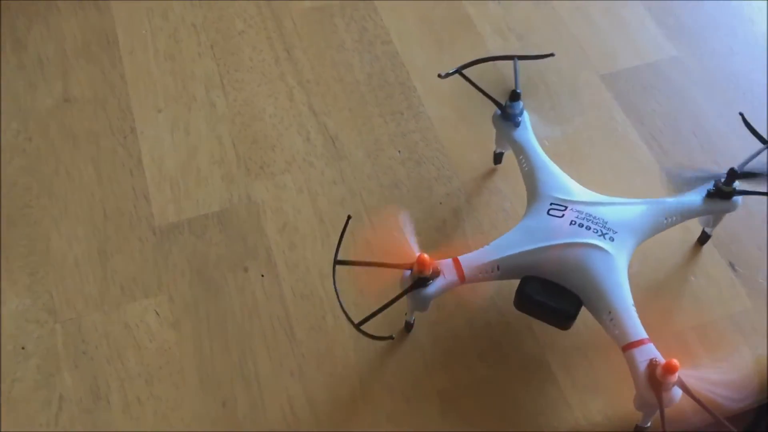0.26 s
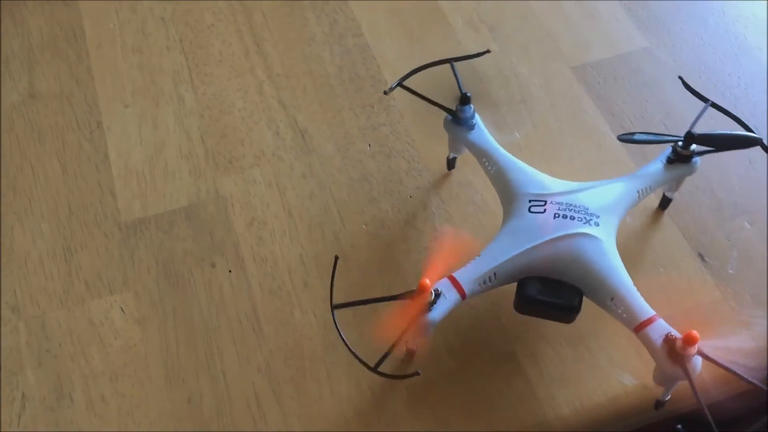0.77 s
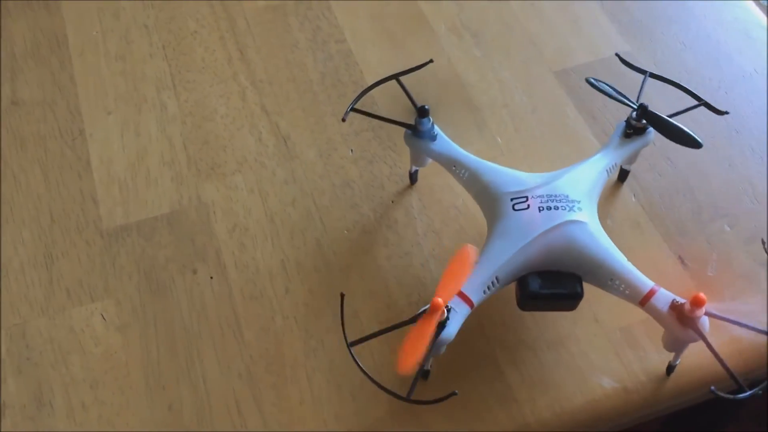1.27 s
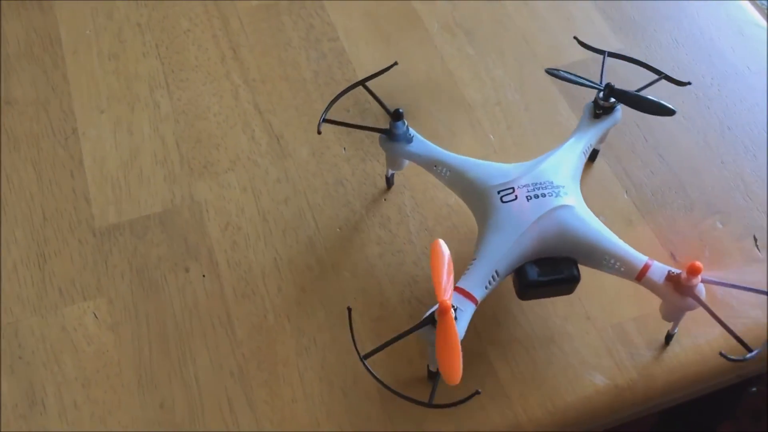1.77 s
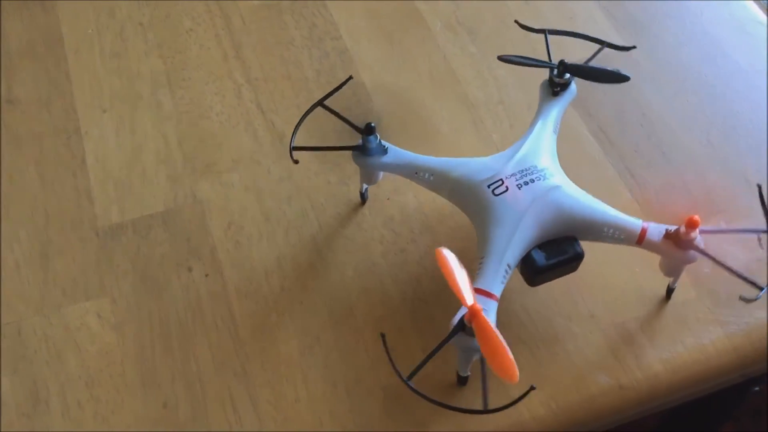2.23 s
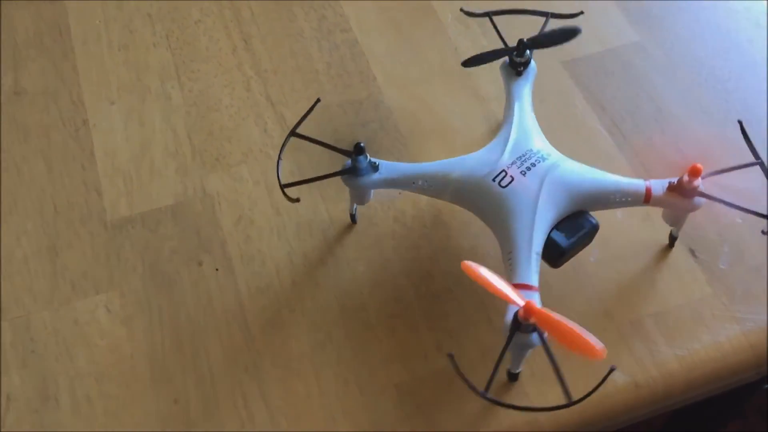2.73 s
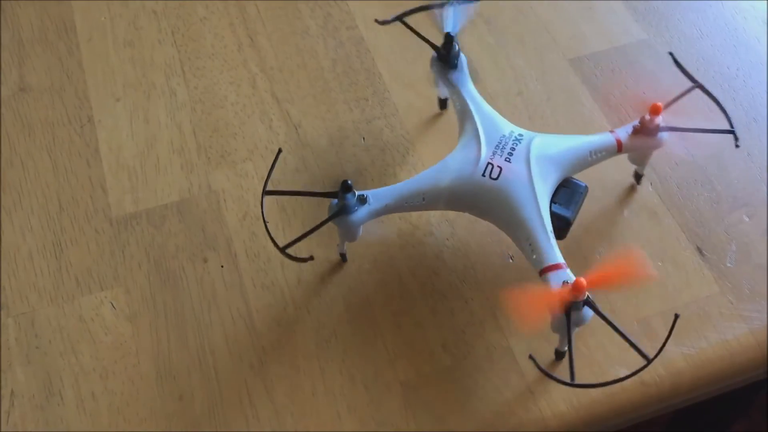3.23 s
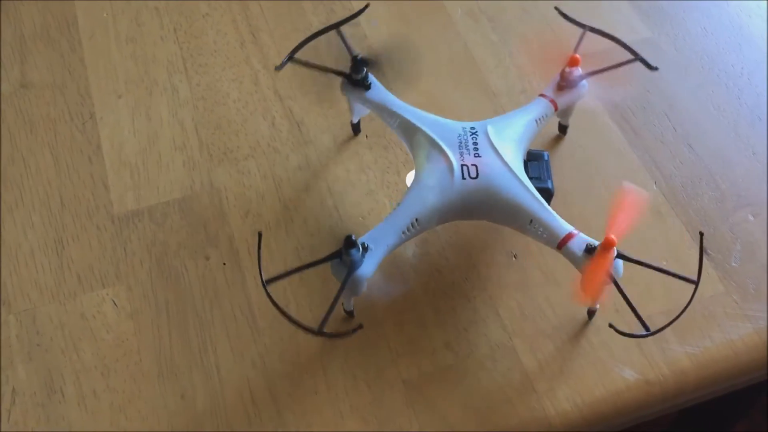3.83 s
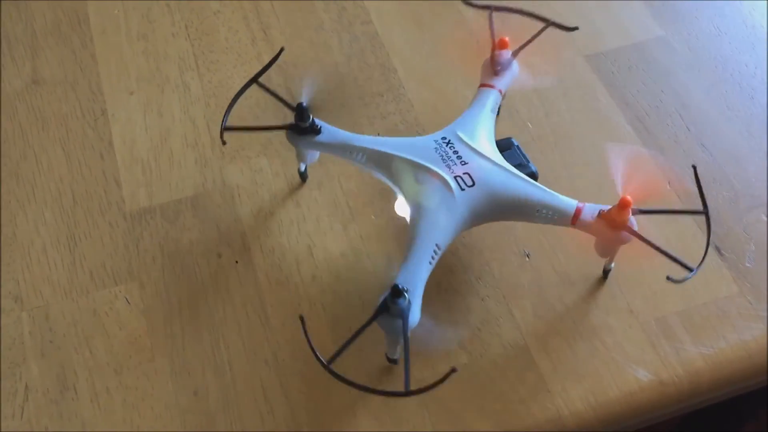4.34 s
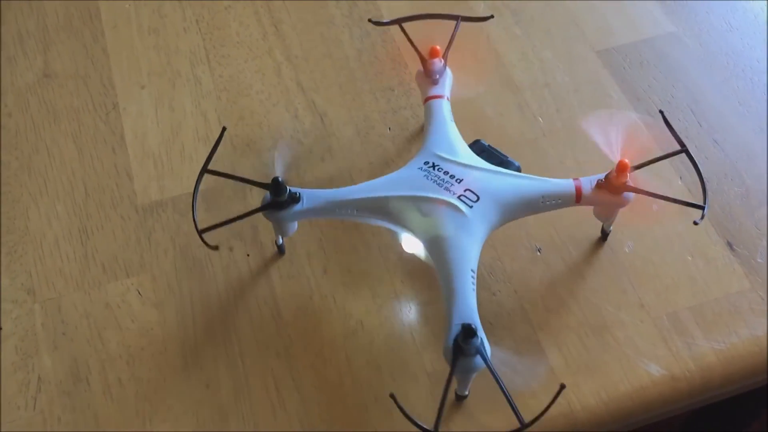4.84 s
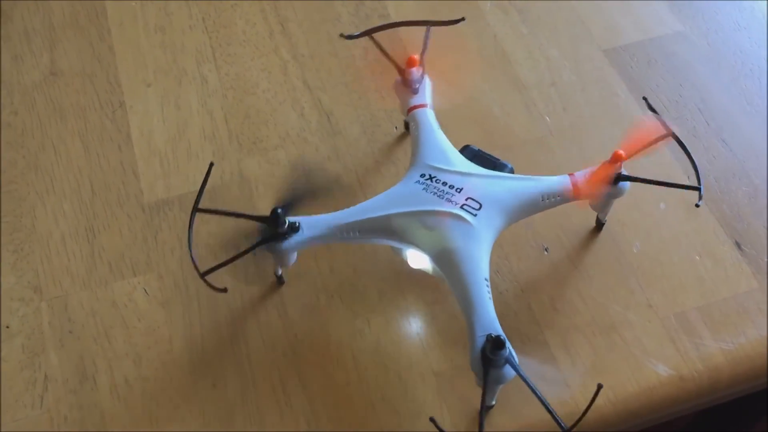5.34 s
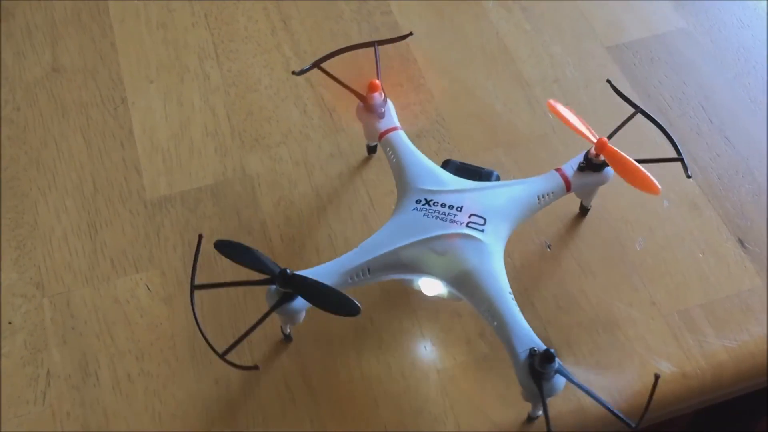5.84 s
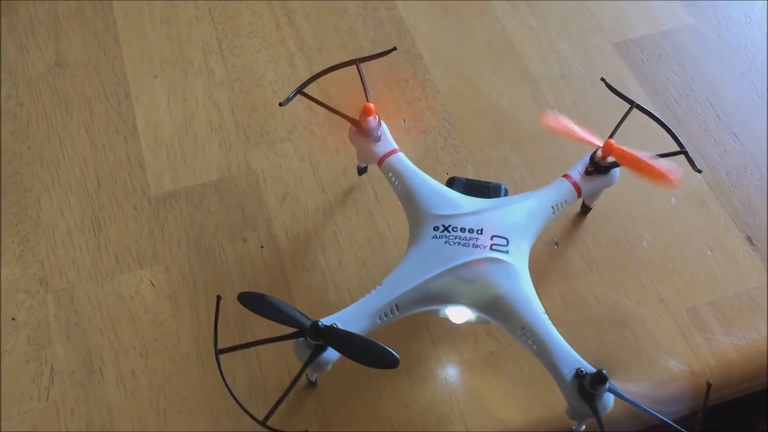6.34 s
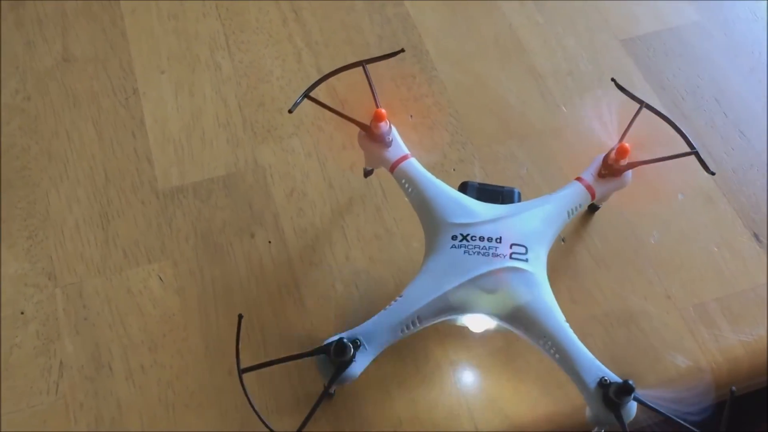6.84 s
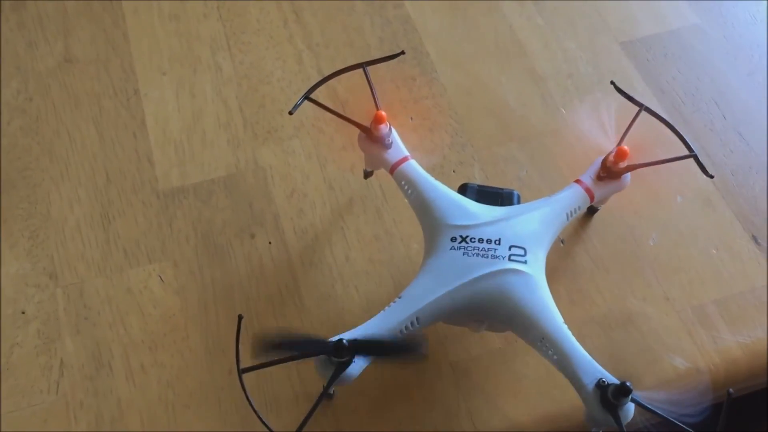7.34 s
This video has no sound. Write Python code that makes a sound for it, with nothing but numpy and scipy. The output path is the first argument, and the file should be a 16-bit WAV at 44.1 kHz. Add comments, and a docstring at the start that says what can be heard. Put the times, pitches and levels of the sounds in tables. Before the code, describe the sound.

A small toy quadcopter buzzes on a wooden table, close and dry, in a quiet room. From 0 s two slightly detuned motors spin up almost instantly to a shrill whine around 2 kHz, beating roughly, with a nasal gear buzz, raspy rattle and bright hiss above and soft propeller churning below. The pitch wavers quickly during the first 1.5 seconds. From about 2.3 to 3 s it sinks by roughly a tone; the hiss is duller and the tones shake about twenty-two times a second as the legs drum on the wood. Tiny dropouts nick the noise, strongest near 2.6 and 4.6 s. Around 5 to 5.4 s the whine climbs back, brighter and clearer. At 6.75 s power cuts: hiss and buzz fade fast, the pitches slide down and separate, and a thin gear whirr dwindles into faint room air and hum by about 7.6 s.

```python
"""Two slightly detuned motor whines beat over a gear rattle and bright hiss, then glide down into a quiet room.
They belong to a toy quadcopter skating on a wooden table; at lower throttle it rocks on its legs and the tones shake.
Sums of shaft orders make the whine, the gear buzz and the last whirr; noise let through in tooth bursts makes
the rasp and hiss. Coloured noise makes the propellers' churning, the legs' rumble and the room air."""
import sys
import numpy as np
from scipy import signal
from scipy.fft import rfft, irfft, next_fast_len
from scipy.io import wavfile

SR = 44100
rng = np.random.default_rng(int(sys.argv[2]) if len(sys.argv) > 2 else 0)


def to_wav(s):
    """Save 16-bit WAV."""
    ch = np.atleast_2d(s).T  # columns
    pcm = np.round(np.clip(ch, -1, 1) * 32767)  # PCM
    wavfile.write(sys.argv[1], SR, pcm.astype(np.int16))


N = 335050

CUT_S = 6.75  # the power is cut
GEAR_RATIO = 7.6  # shaft turns for each turn of the propeller
LOOSE_POWER = 4  # the frame only shakes the tones once it rocks hard


def amp(db):
    """Decibels to gain."""
    return 10 ** (np.asarray(db) / 20)


def unit(x):
    """Scale to rms 1."""
    return x / np.sqrt(np.mean(x ** 2) + 1e-20)


def along(points, hz):
    """Read (Hz, value) points on a log frequency axis."""
    f, v = np.transpose(points)
    return np.interp(np.log(hz + 1), np.log(f + 1), v)


def clock():
    """The time of every sample in seconds."""
    return np.arange(N) / SR


def curves(rows):
    """One value per sample for each column after the time."""
    s, *cols = np.transpose(rows)
    return [np.interp(clock(), s, c) for c in cols]


def wobble(rate):
    """A smooth random curve, rate knots a second."""
    oversample = 4
    knots = rng.standard_normal(int(N * rate / SR) + 4)
    fine = signal.resample_poly(knots, oversample, 1)
    return np.interp(clock() * rate, np.arange(len(fine)) / oversample, fine)


def random_phase():
    """A random starting angle in radians."""
    return rng.uniform(0, 2 * np.pi)


def filtered(x, response):
    """Multiply the spectrum of x by a response of frequency."""
    m = next_fast_len(N + SR // 2)
    return irfft(rfft(x, m) * response(np.fft.rfftfreq(m, 1 / SR)), m)[:N]


def noise(spectrum, bursts=1):
    """Noise of rms 1, let through in bursts and then coloured."""
    return unit(filtered(bursts * rng.standard_normal(N), lambda hz: amp(along(spectrum, hz))))


def shaft(track, coasting, rocking, sway, hunting, swing=0.31):
    """Speed, coasting share of it and angle of a motor; backlash, propeller load and rocking nudge the angle."""
    backlash, loose_backlash = .018, .06  # play of the shaft, and more at full rocking (radians)
    load = .03  # angle by which the propeller's load drags the shaft (radians)
    lag, fall = coasting  # lag and time constant (s)
    off = np.maximum(clock() - CUT_S, 0)
    coast = np.exp(-(off - lag * (1 - np.exp(-off / lag))) / fall)
    speed = (curves(track)[0] + hunting) * coast
    angle = 2 * np.pi * np.cumsum(speed) / SR

    loose = rocking ** LOOSE_POWER
    play = (backlash + loose_backlash * loose) * wobble(120)
    drag = load * np.sin(angle / GEAR_RATIO)
    rock = swing * loose * np.sin(sway + random_phase())
    return speed, coast, angle + play + drag + rock


def noise_dips():
    """Gain that briefly dips the level of the noise."""
    # brief dips in the noise: centre t/s, half length/s, depth/dB
    dip_rows = [(1.71, .009, 9), (2.16, .009, 10), (2.225, .007, 9), (2.352, .008, 9), (2.598, .013, 24),
                (3.115, .008, 9), (3.25, .008, 10), (4.055, .008, 9), (4.377, .009, 12), (4.59, .02, 28),
                (4.935, .007, 9), (5.105, .007, 8), (5.18, .007, 9), (5.615, .007, 9), (5.68, .007, 10),
                (6.815, .007, 8)]
    return amp(-sum(db * np.exp(-np.abs((clock() - s) / half) ** 4) for s, half, db in dip_rows))


def background(hum_hz=120, hum_db=-65, ring_hz=8500, ring_db=-67, air_db=-62):
    """Coloured noise for room air, a steady mains hum and a thin high ring of randomly varying strength."""
    # room air: f/Hz, relative level/dB
    room = [(20, 15), (60, 16), (250, 13), (600, 4), (1000, 6), (4000, 5), (11000, -10), (15000, -23)]
    hum = amp(hum_db) * unit(np.sin(2 * np.pi * hum_hz * clock()))
    ring = amp(ring_db) * unit(wobble(270) * np.sin(2 * np.pi * ring_hz * clock()))
    return hum + ring + amp(air_db) * noise(room)


def wash(motors, rocking, dips, legs_db=-55, churn_db=2.5, unbalance_db=-65, power=4):
    """Low propeller churning, the legs' rumble on the table and a faint unbalance tone once a turn of each shaft."""
    # propeller churning: f/Hz, relative level/dB
    churn_spectrum = [(20, -25), (40, -21), (65, -1.5), (130, -1), (200, 4), (300, -4.5), (400, -4),
                      (480, -24.5), (600, -24.5), (1000, -9), (3000, -28)]
    # swell of the churning: t/s, level/dB
    churn_level = [(0, -50), (1, -52.5), (2.3, -48), (3.2, -58), (4.3, -54.5), (5.3, -49), (6.75, -51.5)]
    # legs drumming on the table: f/Hz, relative level/dB
    legs_spectrum = [(20, -26), (60, -8), (130, 5), (165, -2), (230, -34), (400, -4), (560, -31),
                     (1500, -50)]
    unbalance = sum(np.sin(angle) for _, _, angle in motors)
    churn = amp(curves(churn_level)[0]) * noise(churn_spectrum)
    legs = amp(legs_db) * rocking * noise(legs_spectrum)
    rumble = amp(churn_db * wobble(28)) * dips * (churn + legs)
    coast = motors[0][1]
    return coast ** power * (rumble + amp(unbalance_db) * unbalance)


def whirr(motor, orders=(10, 14, 21)):
    """While the motor coasts, high shaft orders glide down through the shell's main resonance one after another."""
    level_db, resonance_hz, half_width_hz = -44, 2250, 180
    speed, coast, angle = motor
    tones = np.zeros(N)
    for order in orders:
        resonance = 1 / (1 + ((order * speed - resonance_hz) / half_width_hz) ** 2)
        tones += resonance * np.sin(order * angle + .7 * wobble(100))
    return amp(level_db + 2 * wobble(30)) * np.sqrt(coast) * tones


def flickering(x):
    """Each frequency band flickers in level on its own; the very top stays almost smooth."""
    # band edges: f/Hz
    edges = [0, 3000, 5000, 7000, 9000, 11500, 22000]
    # flicker depth of each band: level/dB
    depths = [1.3, 3, 2.6, 2.4, 2, .3]
    out = np.zeros(N)
    for lo, hi, db in zip(edges, edges[1:], depths):
        band = filtered(x, lambda hz: (hz >= lo) & (hz < hi))
        out += amp(db * wobble(100)) * band
    return unit(out)


def buzz(motor, rocking, spectrum, odd_db, mesh_db, free_mesh_db, soften_db, count):
    """High shaft orders slide through fixed resonances; odd ones and multiples of the seven pinion teeth are trimmed."""
    flutter_db, drift_db = 3, 1.7  # each order comes and goes, fast and slowly
    scatter, loose_scatter = .018, .15  # uneven tooth timing for each order, and more at full rocking (radians)
    hop = 256  # samples for each step of level
    speed, coast, angle = motor
    slowing = 1 - coast[::hop]
    out = np.zeros(N)
    for order in range(6, 6 + count):
        hz = order * speed[::hop]
        # slow teeth meet softly and ring only the shell's main resonance
        off_resonance = np.clip(np.abs(np.log(hz / 2200)) - .08, 0, .8)
        softening_db = soften_db * slowing ** 2 * off_resonance
        if order % 7 == 0:
            accent_db = mesh_db + free_mesh_db * slowing
        else:
            accent_db = odd_db * (order % 2)
        line_db = np.repeat(along(spectrum, hz) - softening_db + accent_db, hop)[:N]
        size = amp(line_db + flutter_db * wobble(48) + drift_db * wobble(11))
        # uneven timing widens the higher lines
        timing = (scatter + loose_scatter * rocking ** LOOSE_POWER) * order * wobble(130)
        out += size * np.sin(order * angle + timing + random_phase())
    return unit(out)


def gears(motors, rocking, lean_db, dips):
    """Teeth strike twice a turn with uneven force: a shell buzz, a rasp and a bright hiss; rocking weakens the buzz."""
    # shell buzz: f/Hz, relative level/dB
    shell_spectrum = [(300, -80), (700, -46), (1200, -32), (1750, -17), (2200, 10.5), (2500, 6), (2870, 2),
                      (3080, 1), (3350, -7), (3600, 8), (4000, -61), (4500, -53), (7000, -66)]
    # teeth of motor A: f/Hz, relative level/dB
    teeth_spectrum = [(2800, 3), (3350, 3.5), (3620, 8), (3950, -2.5), (4250, 3), (4650, -1.5), (5050, 0.5),
                      (5450, 9), (5850, 6), (6700, 6.5), (7500, 0.5), (8400, 0.5), (10000, 4), (11500, 1),
                      (15000, -3)]
    # teeth of motor B: f/Hz, relative level/dB
    far_teeth_spectrum = [(2800, 1), (3200, 1), (3600, 8), (4000, -4.5), (4400, 8), (4800, -9),
                          (5200, -1.5), (5600, -0.5), (6400, 2.5), (7300, 1), (8000, -15)]
    # rattle heard through the shell: f/Hz, relative level/dB
    rasp_spectrum = [(300, -80), (600, -24.5), (1020, -15), (1400, -7), (1800, -4), (2250, -0.5),
                     (2700, -7.5), (3080, -17), (3600, -40), (4500, -32), (7000, -47)]
    # bright gear hiss: f/Hz, relative level/dB
    hiss_spectrum = [(2000, -39), (3080, -7), (3450, -2.5), (3950, -8), (4700, -8.5), (5400, -5.5),
                     (6300, .5), (7200, -2.5), (8100, -3), (9500, .5), (10600, -.5), (12000, 2),
                     (14000, 1.8), (15300, 1.8)]
    # swell of the hiss and teeth: t/s, relative level/dB
    hiss_level = [(0, -29.5), (1.03, -30.5), (1.5, -32), (1.66, -35), (1.78, -33), (2.02, -32.5),
                  (2.14, -36), (3.3, -36), (4.65, -36.5), (4.88, -32), (5.07, -37.5), (5.13, -31.5),
                  (5.24, -34), (5.53, -32.3), (5.64, -35), (5.74, -31), (5.97, -33.5), (6.04, -30.5),
                  (6.22, -32), (6.55, -32), (6.76, -29.3)]
    # how clearly the teeth sing through the hiss: t/s, relative level/dB
    meshing = [(0, -0.5), (.15, -1), (1.3, 0), (2.02, 1), (2.12, -1), (2.36, 0), (2.5, -4.5), (5.05, -4),
               (5.35, -1), (6.75, -0.5)]
    buzz_db, rasp_over_buzz_db, freewheel_db = -34, -8, -18
    hiss_db, teeth_over_hiss_db = 3.5, 1.3
    far_shell_db, far_teeth_db, rocked_buzz_db = -2, -3, -6
    buzz_power, rasp_power, hiss_power = 4, 1.6, 3.55  # each layer falls with this power of coasting speed
    spin_up_s = 0.08  # the shell's buzz builds up as the motors gather speed
    eccentric_db = .8  # the big gear runs slightly out of true, once a propeller turn

    a, b = motors
    _, coast, angle = a
    _, coast_b, angle_b = b
    steady = amp(rocked_buzz_db * rocking)
    press_a = amp(eccentric_db * np.sin(angle / GEAR_RATIO))
    press_b = amp(eccentric_db * np.sin(angle_b / GEAR_RATIO))
    near_a = amp(0.8 * lean_db * coast)
    near_b = amp(-lean_db * coast / 2) * (coast_b / coast) ** 3  # motor B coasts down faster and fades first
    bursts = np.exp(0.42 * np.cos(2 * angle)) * amp(wobble(2500))

    shell_a = buzz(a, rocking, shell_spectrum, odd_db=-5, mesh_db=1, free_mesh_db=-3, soften_db=300, count=18)
    shell_b = buzz(b, rocking, shell_spectrum, odd_db=0, mesh_db=-2, free_mesh_db=-6, soften_db=300, count=12)
    teeth_a = buzz(a, rocking, teeth_spectrum, odd_db=-14, mesh_db=0, free_mesh_db=2, soften_db=75, count=25)
    teeth_b = buzz(b, rocking, far_teeth_spectrum, odd_db=-8.5, mesh_db=2.5, free_mesh_db=-15,
                   soften_db=62, count=14)
    spin_up = 1 - np.exp(-clock() / spin_up_s)
    shell_pair = near_a * press_a * shell_a + amp(far_shell_db) * near_b * press_b * shell_b
    teeth_pair = press_a * teeth_a + amp(far_teeth_db) * near_b * press_b * teeth_b
    shell_buzz = amp(buzz_db) * coast ** buzz_power * steady * spin_up * shell_pair
    tooth_buzz = steady * amp(curves(meshing)[0]) * teeth_pair

    scraping = coast ** rasp_power + amp(freewheel_db)  # the freewheeling gears keep up a faint rasp
    rasp = amp(buzz_db + rasp_over_buzz_db) * scraping * dips * flickering(noise(rasp_spectrum, bursts))
    # dividing by coast lets the tooth tones outlast the hiss a little; they dip half as deep in dB
    teeth = amp(teeth_over_hiss_db) * np.sqrt(dips) * tooth_buzz / coast
    hiss = dips * flickering(noise(hiss_spectrum, bursts))
    bright_gain = amp(hiss_db + curves(hiss_level)[0]) * coast ** hiss_power
    return shell_buzz + rasp + bright_gain * (teeth + hiss)


def whine(motors, rocking, lean_db, sway, rock=.06, swell_db=1.32, radiate_hz=660):
    """Low orders of both shafts beat against each other and throb as the frame rocks and its legs tap."""
    # lowest tone, order 2: t/s, relative level/dB
    low_tone = [(0.0, -40), (0.96, -40), (1.13, -45), (1.54, -44.5), (1.69, -40), (2.1, -44), (4.32, -36),
                (4.66, -39.5), (5.04, -35.5), (5.08, -40), (5.56, -35.5), (6.17, -36), (6.26, -52),
                (6.35, -34.5), (6.39, -42.5), (6.75, -40)]
    # tone above it, order 3: t/s, relative level/dB
    third_tone = [(0.0, -50), (0.09, -39), (0.96, -38.5), (1.0, -33), (1.09, -43), (1.14, -33), (1.16, -36),
                  (2.16, -37.5), (2.69, -45), (4.87, -44), (4.96, -49.5), (5.41, -36), (6.47, -37),
                  (6.75, -32.5)]
    # tone just under the main whine, order 4: t/s, relative level/dB
    mid_tone = [(0.0, -37.5), (0.32, -35), (1.2, -31.5), (1.58, -40.5), (1.75, -36.5), (5.04, -41),
                (5.11, -51), (5.13, -46), (5.62, -39.5), (5.64, -43.5), (6.07, -33.5), (6.13, -44),
                (6.19, -34), (6.22, -44), (6.47, -35), (6.6, -51), (6.69, -29), (6.75, -32)]
    # main whine, order 5: t/s, relative level/dB
    main_tone = [(0.0, -20), (0.05, -28), (0.07, -20.5), (2.25, -23), (3.4, -28.5), (3.42, -22),
                 (3.44, -26.5), (4.02, -27), (4.72, -25), (4.77, -30.5), (4.81, -22.5), (4.98, -27.5),
                 (5.19, -21), (6.02, -24.5), (6.05, -21), (6.22, -25.5), (6.39, -21), (6.75, -21.5)]
    # how much each of orders 2 to 5 wavers; the main whine is the steadiest: share
    blurs = (2.2, 1.4, 1, .6)
    # orders 2 to 5: trim/dB, motor A over B/dB, change at full rocking/dB, share of the lean,
    # power of speed while coasting
    shaft_tones = [(0.5, 4.5, 1.5, -0.89, 4.2), (0.5, -0.5, -1, 0.65, 12.5), (0.2, 1.5, -2, 1.6, 6.4),
                   (-0.18, -8.5, 0, -0.5, 9.3)]
    steady_waver, loose_waver, coast_waver = .1, .17, 2.2  # phase blur: steady, full rocking, coasting (radians)
    steady_shake, loose_shake = .018, .044  # random shaking for each order, and more at full rocking
    tap, rebound = .042, .024  # throb for each order from the leg taps and their rebounds

    def throb(count):
        return np.sin(count * sway + random_phase())

    loose = rocking ** LOOSE_POWER
    out = np.zeros(N)
    levels = (low_tone, third_tone, mid_tone, main_tone)
    for order, (level, blur, tone) in enumerate(zip(levels, blurs, shaft_tones), 2):
        trim_db, balance_db, rocked_db, leaning, fall = tone
        db = curves(level)[0] + trim_db + rocked_db * rocking
        ratio = amp(balance_db + leaning * lean_db)
        balance = np.sqrt(2 / (1 + ratio ** 2))  # keeps the power of the pair constant
        for (_, coast, angle), share in zip(motors, (ratio, 1)):
            # two taps for each rock, each with a rebound
            taps = order * loose * (rock * throb(1) + tap * throb(2) + rebound * throb(4))
            shaking = (steady_shake + loose_shake * loose) * order * wobble(190)
            size = amp(db + swell_db * wobble(38)) * share * balance * coast ** fall
            blur_depth = blur * (steady_waver + loose_waver * loose) + coast_waver * (1 - coast) ** 2
            waver = blur_depth * wobble(45)
            out += size * (1 + shaking + taps) * np.sin(order * angle + waver + random_phase())
    # the small shell cannot radiate low tones
    return filtered(out, lambda hz: 1 - 1 / (1 + (hz / radiate_hz) ** 10))


def scene():
    """Two motors on one rocking frame share its sway and their speed hunting; brief dips cut into the noise."""
    # shaft speed of motor A under power, before hunting: t/s, f/Hz
    motor_a = [(0, 362), (.05, 392), (.15, 415), (.4, 421), (.52, 415.5), (.68, 420), (.8, 412), (1.3, 422),
               (1.55, 415.5), (1.85, 414), (2, 421), (2.22, 424), (2.35, 415), (2.5, 398), (3, 372),
               (5.05, 372), (5.38, 413), (5.67, 416), (6.1, 414), (6.42, 402), (6.75, 403)]
    # shaft speed of motor B under power, before hunting: t/s, f/Hz
    motor_b = [(0, 379), (.06, 382), (.14, 393), (.25, 401), (.45, 402), (.57, 397), (.7, 402), (.85, 397),
               (1.17, 411), (1.42, 409), (1.6, 403), (1.85, 399.5), (2, 406.5), (2.27, 407), (2.55, 385),
               (3, 381), (4.6, 384), (5.05, 377), (5.39, 403), (5.5, 398), (5.64, 402), (5.88, 398.5),
               (6.25, 406), (6.42, 398), (6.55, 401), (6.72, 418), (6.75, 416)]
    # how the frame sits: t/s, rocking/0-1, lean towards motor A/dB
    stance = [(0, 0.74, 9.5), (1, 0.65, 6), (2.2, 0.79, 5), (2.7, 1, -2), (4.95, 1, 0.5), (5.3, 0.82, -4.5),
              (6.2, 0.73, -1.5), (6.75, 0.78, 0)]
    # hunting of the speed, half as deep in motor A: t/s, depth/Hz
    hunting_depth = [(0, 1.5), (.5, 5), (1.05, 5.5), (1.25, .5), (1.42, 3), (1.65, .5), (6.75, .3)]
    rock_hz, hunt_hz = 22.1, 12.8  # mean rocks a second; speed swings a second
    rocking, lean_db = curves(stance)
    sway = 2 * np.pi * np.cumsum(rock_hz + 1.1 * wobble(12)) / SR
    hunting = curves(hunting_depth)[0] * np.sin(2 * np.pi * hunt_hz * clock() + wobble(2.37) / 2)
    # coasting: lag (s), time constant (s)
    a = shaft(motor_a, (0.042, .58), rocking, sway, hunting / 2)
    b = shaft(motor_b, (0.028, 0.48), rocking, sway, hunting)
    motors = [a, b]
    dips = noise_dips()
    mix = background() + wash(motors, rocking, dips) + whirr(a)
    mix += gears(motors, rocking, lean_db, dips)
    mix += whine(motors, rocking, lean_db, sway)
    return mix[None]


def record(dry, top_hz=15400):
    """A sharp band limit removes everything from top_hz up."""
    return filtered(dry[0], lambda hz: hz < top_hz)[None]


dry = scene()
out = record(dry)
to_wav(out)
```